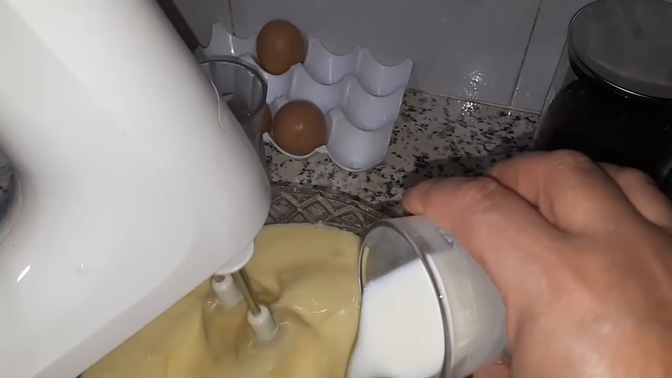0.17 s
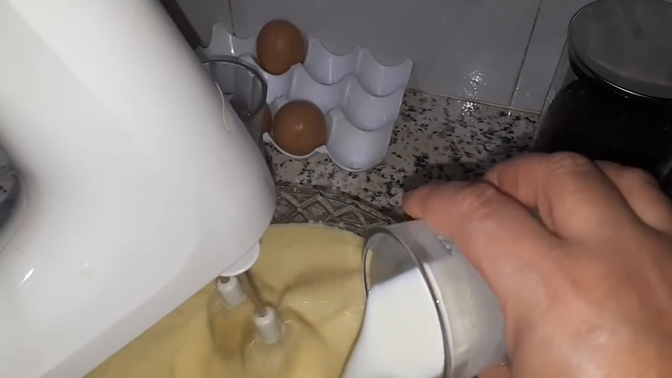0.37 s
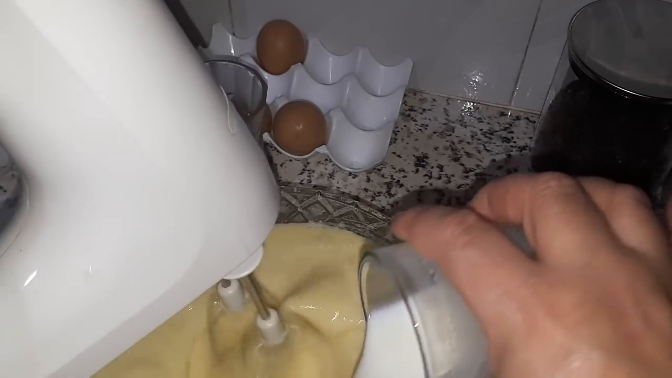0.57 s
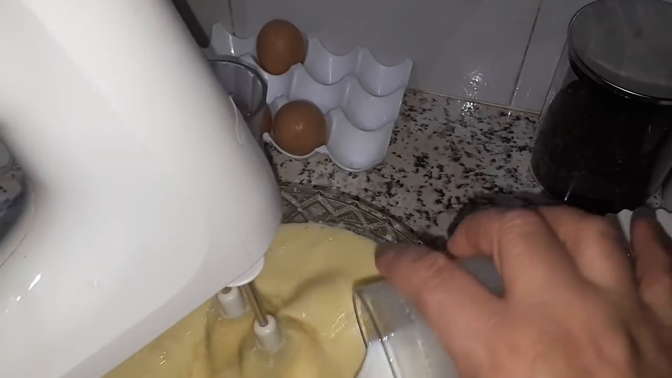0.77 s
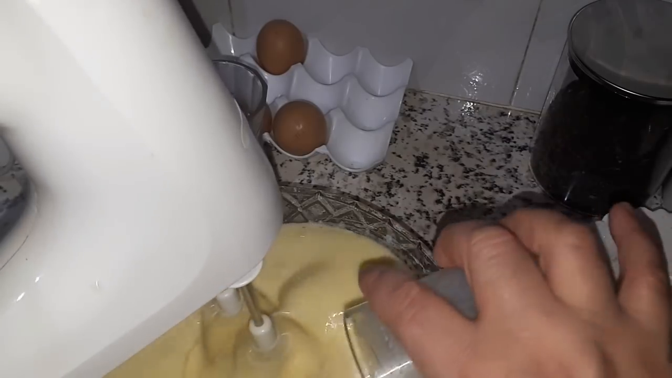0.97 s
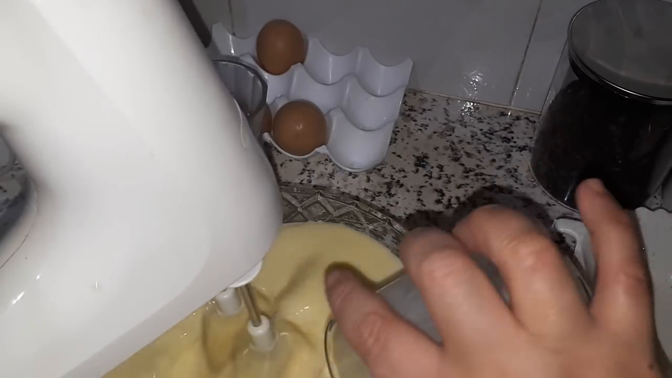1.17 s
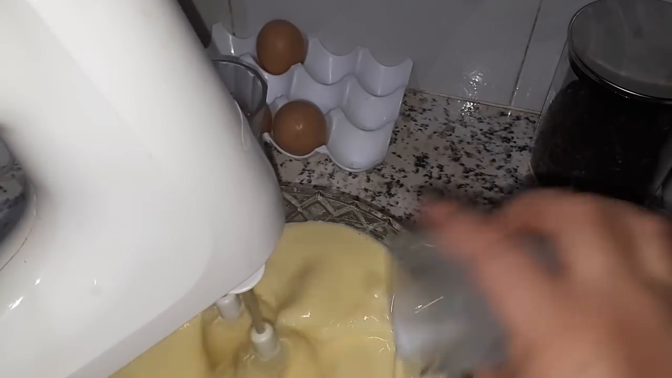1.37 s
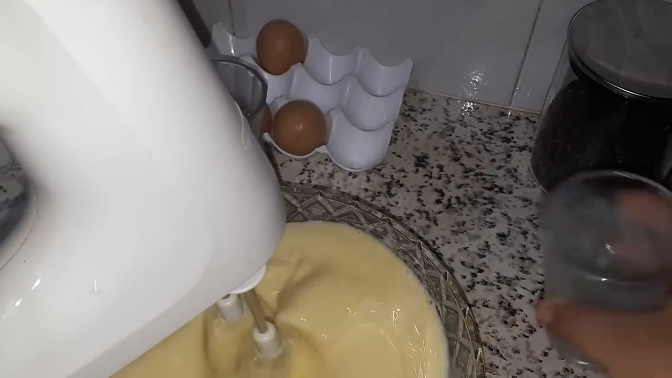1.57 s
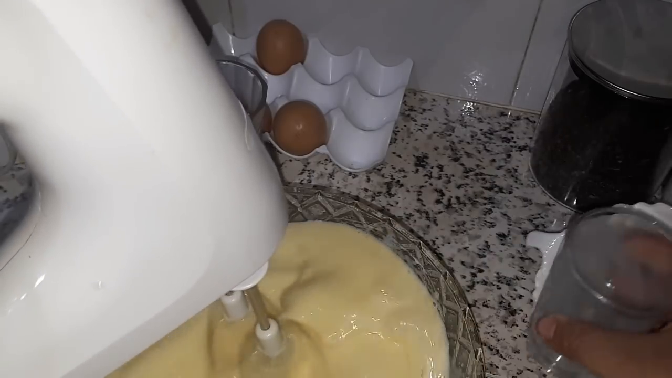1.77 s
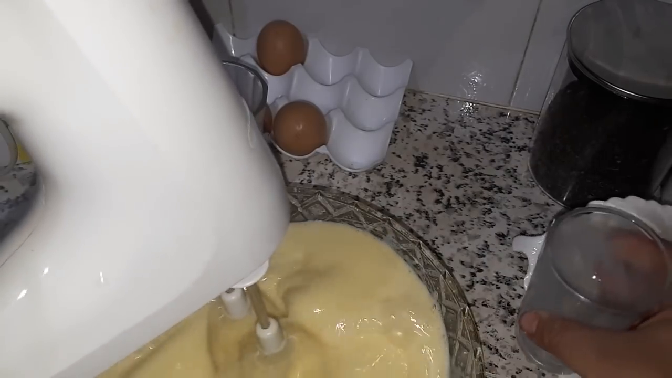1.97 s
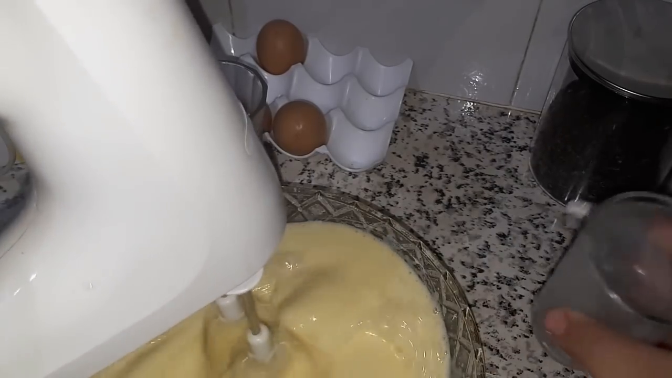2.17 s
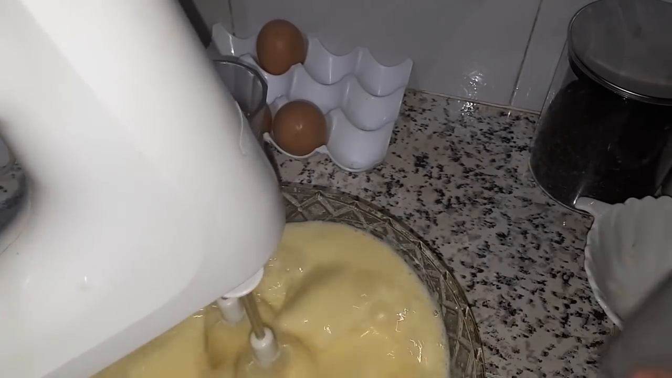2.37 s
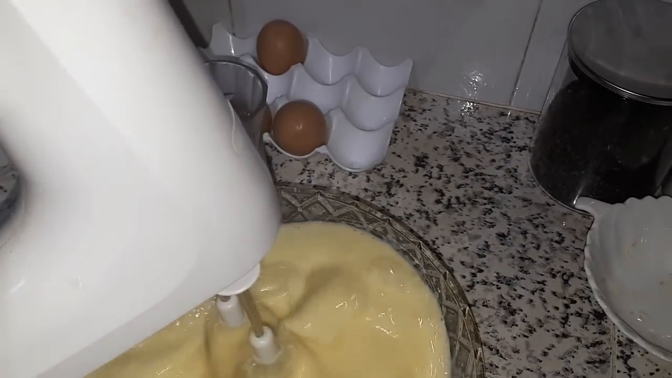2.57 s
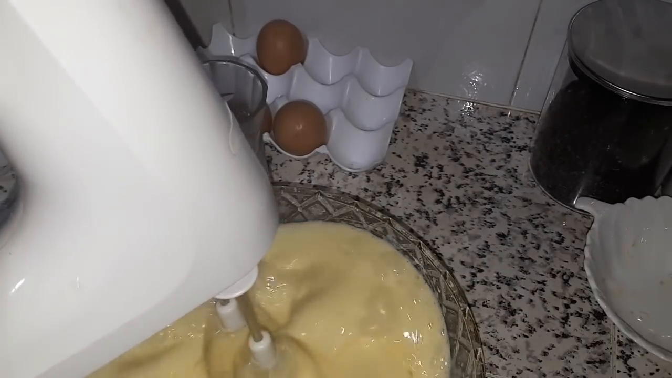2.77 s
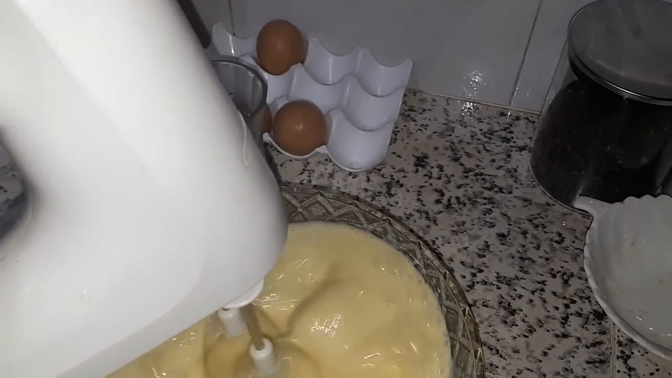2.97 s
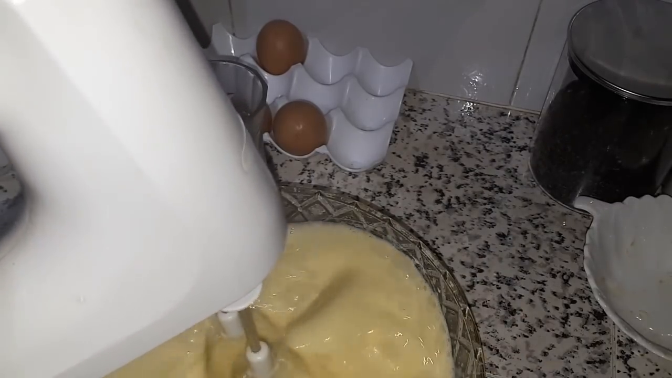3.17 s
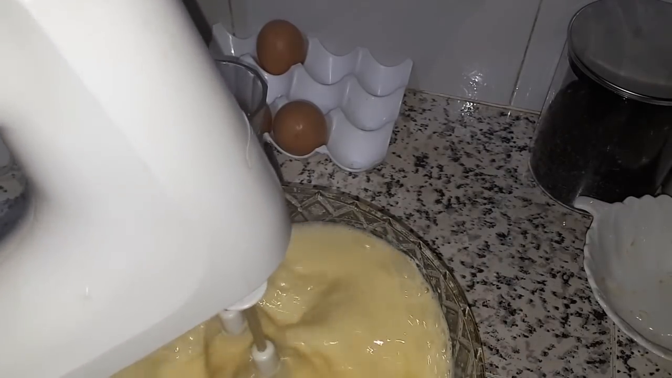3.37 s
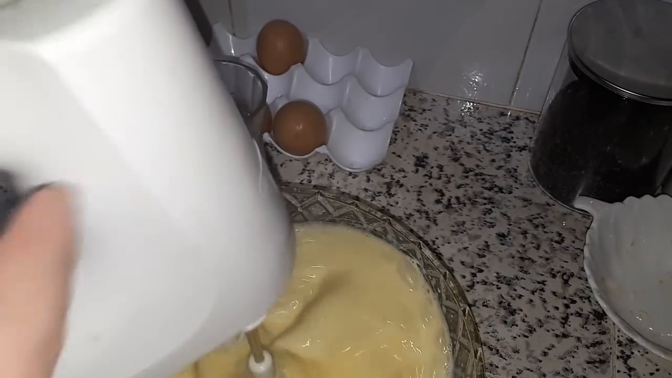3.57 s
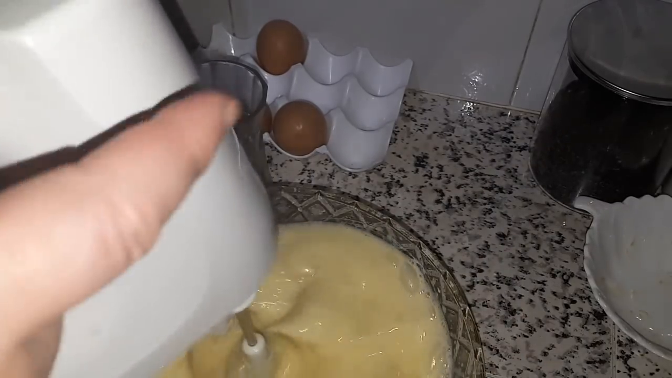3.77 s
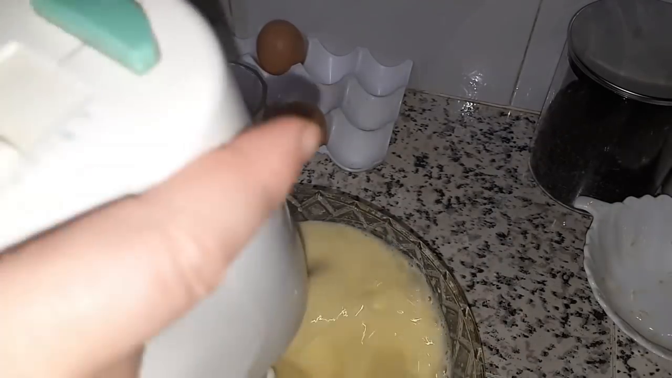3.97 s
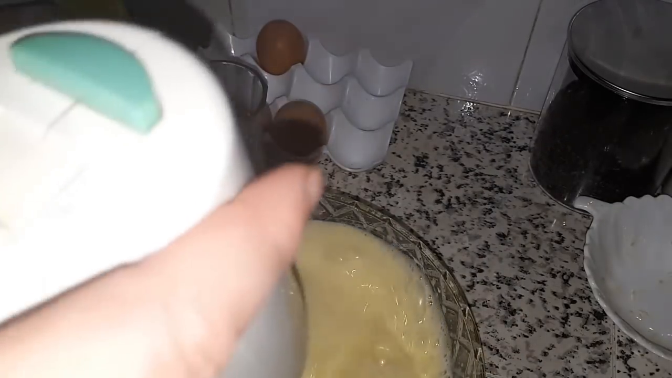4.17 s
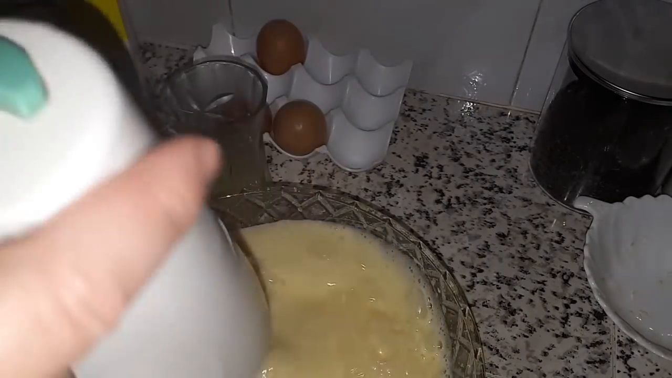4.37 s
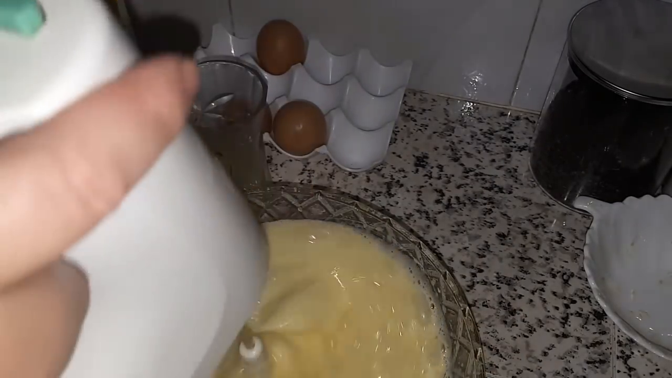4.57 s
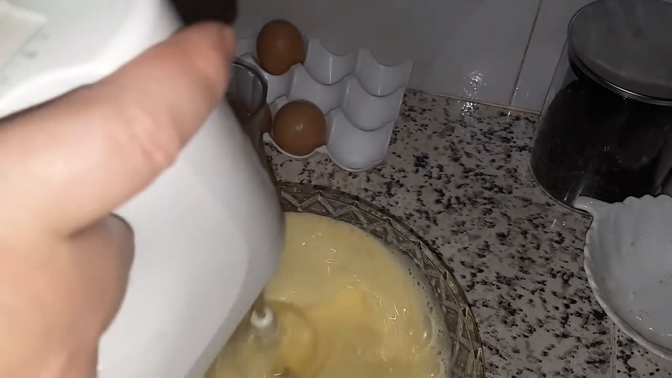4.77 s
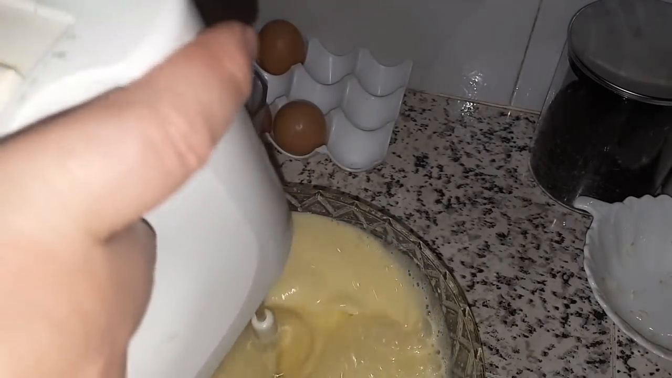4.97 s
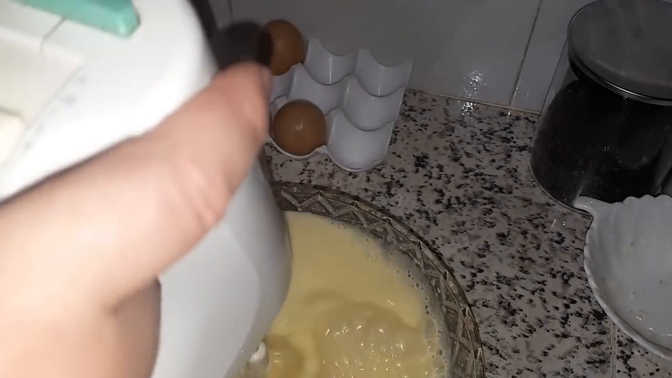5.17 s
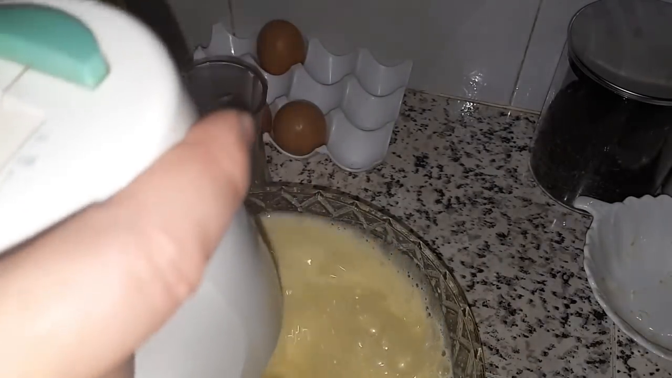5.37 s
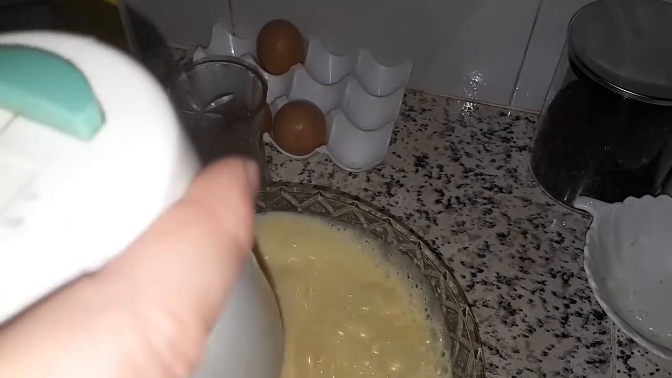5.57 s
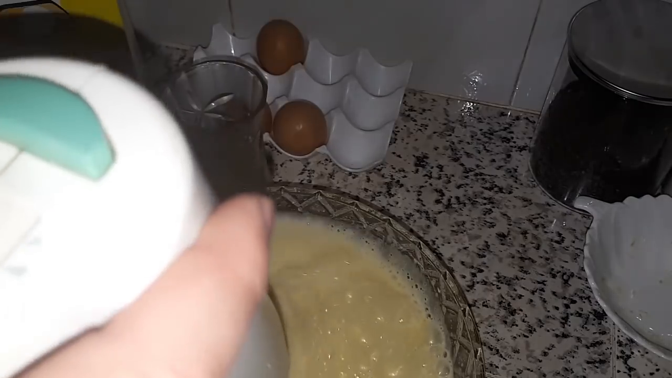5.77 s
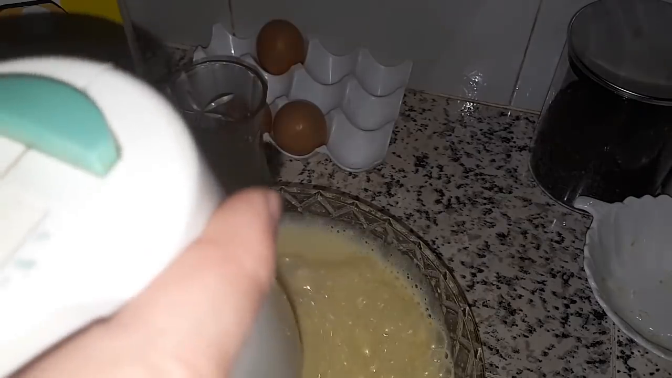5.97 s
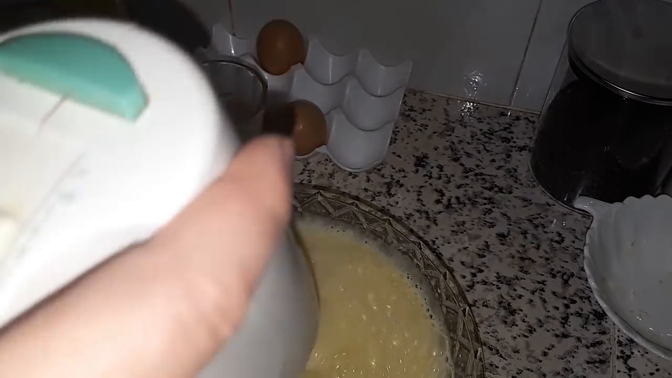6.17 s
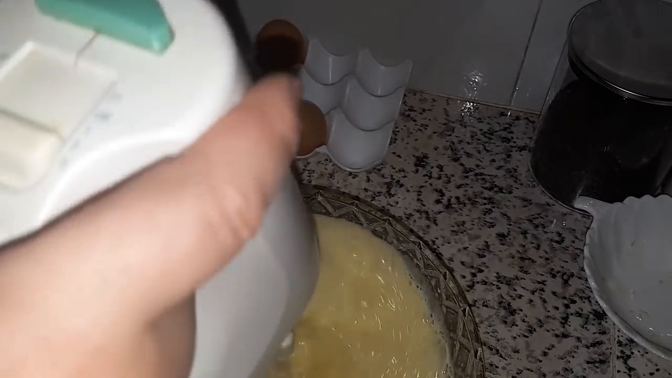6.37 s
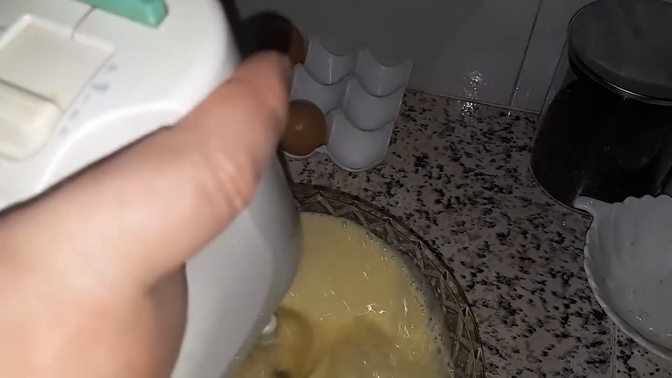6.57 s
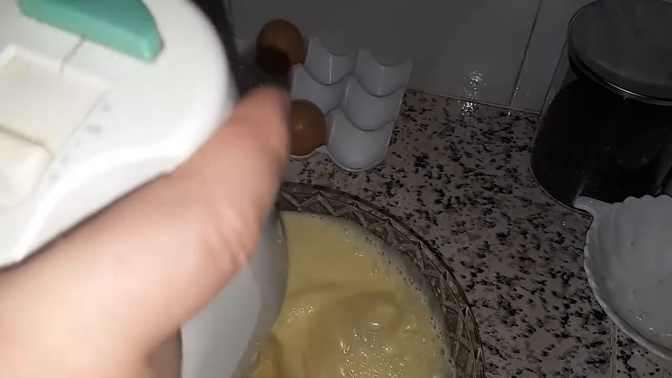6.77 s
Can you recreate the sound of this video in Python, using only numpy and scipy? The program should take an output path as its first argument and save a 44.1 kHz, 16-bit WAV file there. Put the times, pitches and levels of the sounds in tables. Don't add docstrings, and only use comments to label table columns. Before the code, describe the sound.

Close phone pickup in a small tiled kitchen: an electric mixer buzzes continuously, dry and rough, its beaters churning thick batter and tapping the bowl. A drinking glass rattles onto a dish and clinks again shortly after, while the motor sounds briefly quieter. Then the whir swells back, its resonance changes with handling, knocks become stronger and more frequent, and a few blunt batter slaps come near the end.

```python
import sys
import numpy as np
from scipy import signal
from scipy.fft import rfft, irfft, next_fast_len
from scipy.io import wavfile
from scipy.ndimage import uniform_filter1d, map_coordinates

SR = 44100
rng = np.random.default_rng(int(sys.argv[2]) if len(sys.argv) > 2 else 0)


def waveform_to_disk(signal):
    frames = np.transpose(np.atleast_2d(signal))
    scaled = np.clip(frames, -1, 1) * 32767
    samples = np.round(scaled).astype(np.int16)
    wavfile.write(sys.argv[1], SR, samples)


def decibels_to_gain(level_db):
    exponent = np.asarray(level_db, float) / 20
    return 10 ** exponent


N = 300301
T = np.arange(N) / SR
SIZE = next_fast_len(N, True)
F = np.maximum(np.fft.rfftfreq(SIZE, 1 / SR), 1)
SHAFT_HZ, GEAR_RATIO = 166.85, 12


def at_time(table):
    return np.interp(T, *np.transpose(table))


def along(table):
    hz, value = np.transpose(table)
    return np.interp(np.log(F), np.log(np.maximum(hz, 1)), value)


def walk(rate_hz):
    k = int(SR / rate_hz)
    steps = np.repeat(rng.standard_normal(N // k + 1), k)
    w = uniform_filter1d(uniform_filter1d(steps, k), k)[:N]
    return w / w.std()


def unit_rms(x):
    return x / np.sqrt(np.mean(x ** 2))


def held(start_s, hold_s, attack_s, release_s):
    rise = np.clip((T - start_s) / attack_s, 0, 1)
    return rise * np.exp(-np.maximum(T - start_s - attack_s - hold_s, 0) / release_s)


def at_ports(phase, lead_rad):
    return np.sin(phase - np.array([[0], [lead_rad]])) / max(abs(np.cos(lead_rad / 2)), .6)


# pitch_hz, lead_rad
PORT_LEAD = [(0, 0.31), (1810, 0.96), (2150, 1.14), (3450, 7.99), (4820, 8.66), (6500, 15), (10900, 24.23),
             (15500, 22.8)]
# pitch_hz, likeness (0-1)
PORT_LIKENESS = [(60, .92), (150, .96), (400, .92), (1000, .72), (2500, .56), (6000, .58), (12000, .42)]
# pitch_hz, level_db
PORT_BALANCE = [(125, -1.5), (300, 1.5), (600, 0), (1200, 0.1), (4000, 0.5), (9000, 0)]


def ports(force):
    same, other = rfft(force * rng.standard_normal((2, N)), SIZE, axis=1)
    alike = np.clip(along(PORT_LIKENESS), 0, 1)
    lead_rad = np.interp(F, *np.transpose(PORT_LEAD))
    right = (alike * same + np.sqrt(1 - alike ** 2) * other) * np.exp(-1j * lead_rad)
    balance = decibels_to_gain(along(PORT_BALANCE) * np.array([[.5], [-.5]]))
    mono_loss = np.sqrt((1 + 1.33 * alike * np.cos(lead_rad)) / 2)
    return np.array([same, right]) * balance / mono_loss


# pitch_hz, width_hz, level_db
COLOUR_HOLLOWS = [(1660, 26, -15), (2565, 245, -5.5)]


def colour(bed, peaks):
    power = decibels_to_gain(2 * (along(bed) - 1.85))
    for hz, width_hz, db in peaks:
        power = power + decibels_to_gain(2 * db) / (1 + (2 * (F - hz) / max(width_hz, hz / 28)) ** 2) ** 2
    hollow_db = sum(db / (1 + (2 * (F - hz) / width_hz) ** 2) for hz, width_hz, db in COLOUR_HOLLOWS)
    power = power * decibels_to_gain(2 * hollow_db)
    cepstrum = irfft(np.log(power) / 2, SIZE)
    cepstrum[1:SIZE // 2] *= 2
    cepstrum[SIZE // 2:] = 0
    return np.exp(rfft(cepstrum))


def rattle(rate_hz, scatter_db, decay_ms):
    sizes = decibels_to_gain(scatter_db * np.clip(rng.standard_normal(N), -2, 2))
    hits = (rng.random(N) < rate_hz / SR) * sizes
    return unit_rms(signal.lfilter([1], [1, -np.exp(-1000 / (decay_ms * SR))], hits))


def shaking_forces(shaft):
    beater = shaft / GEAR_RATIO
    blades = 1 + 0.028 * np.cos(beater) + 0.088 * np.cos(2 * beater + 1) + 0.044 * np.cos(4 * beater + 2)
    load_db = 0.35 * walk(12)
    batter = (0.74 + 0.32 * rattle(120, 5.2, 5.4)) * blades
    beating = (0.41 + 0.42 * rattle(220, 1.9, 6.6)) * blades * decibels_to_gain(load_db)
    gears_low = (.5 + .5 * rattle(400, 2.9, 6.2)) * (1 + 0.18 * np.cos(shaft))
    gears_low = gears_low * decibels_to_gain(load_db + 0.5 * walk(20))
    gears_high = (.5 + .5 * rattle(420, 3.0, 3.9)) * (1 + 0.2 * np.cos(shaft))
    gears_high = gears_high * decibels_to_gain(load_db + 0.14 * walk(11))
    brushes_low = (0.5 + 0.63 * rattle(300, 4.0, 2.2)) * (1 + 0.072 * np.cos(shaft + 1))
    brushes_low = brushes_low * decibels_to_gain(0.13 * load_db + 1.22 * walk(22.07))
    brushes_high = (1 + 0.18 * np.cos(shaft + 2)) * decibels_to_gain(.5 * load_db + 1.5 * walk(18))
    return [batter, beating, gears_low, gears_high, brushes_low, brushes_high]


POSE_S = [
    1.6,
    3.0,
    3.8,
    4.7,
    6.2,
]
BAND_EDGES_HZ = [620, 1720, 4750, 7900, 11600]
# pitch_hz, width_hz, level_db
ALONE = [(310, 51, -4.5), (1020, 165, 0), (1350, 29, -8), (1883, 23, 0.5), (2415, 44, -4.5),
         (3340, 570, -1.5), (3660, 48, -3), (4200, 280, -2.5), (5370, 82, 1), (5880, 310, 2.5),
         (6620, 400, -3), (10580, 530, -5), (10960, 370, -2)]
# pitch_hz, width_hz, level_db
SETTLED = [(319, 40, -12), (1037, 190, -3), (1913, 28, 0.5), (3300, 280, 1), (3780, 43, 0),
           (4190, 180, 1.5), (4610, 79, -3), (5420, 110, 3), (5850, 290, 4.5), (6560, 380, 1),
           (10640, 1100, -6.5)]
# pitch_hz, width_hz, level_db
TOUCHED = [(1010, 420, -3), (1486, 210, -2.5), (3410, 23, -0.5), (3800, 160, -0.5), (4600, 120, -2.5),
           (5500, 69, -3), (5730, 64, -3), (6370, 370, -2), (10670, 1000, -5)]
# pitch_hz, width_hz, level_db
GRIPPED = [(1020, 200, 7), (1420, 310, 3.5), (1828, 77, 0), (2034, 39, -2), (2743, 79, -4.5),
           (3100, 20, -3), (3160, 49, -15), (3880, 76, -4), (4160, 93, -0.5), (4530, 53, -7),
           (5640, 430, 3), (6000, 200, 2), (10600, 1000, -4)]
# pitch_hz, width_hz, level_db
TURNED = [(415, 68, -1.5), (1010, 255, 2), (1474, 270, -3), (1916, 45, -5), (2290, 110, -5.5),
          (2700, 53, -9), (3200, 82, -8), (3690, 69, -4.5), (4200, 410, -3), (5500, 300, 2.5),
          (5950, 200, -5), (6400, 830, -5), (10600, 1300, -4.5)]
# pitch_hz, width_hz, level_db
BOWL = [(325.6, 69, -2.5), (430.4, 71, -2.5), (960, 35, -30)]
# pitch_hz, level_db (per Hz)
BEDS = [
    [(25, -34), (250, -7), (604, -18.5), (1010, -5.5), (2660, -7), (5820, -4), (8970, -16.5),
     (15800, -24.5)],
    [(25, -36), (307, -6), (542, -25), (929, -13.5), (2590, -4.5), (6490, -7.5), (7420, -10), (15800, -18)],
    [(25, -55), (161, -9.5), (473, -15), (955, -4), (2730, -11), (5500, -10), (7830, -11), (15800, -21)],
    [(25, -54), (161, -15), (542, -20), (981, 6), (1680, -12), (6000, -3), (8200, -9), (15800, -17)],
    [(25, -53), (165, -8), (672, -12.5), (1220, -7.5), (2890, -10.5), (5520, -8), (8270, -12.5),
     (15800, -17.5)],
]


def housing(shaft, heard_db):
    below = [0, *(1 / (1 + (F / hz) ** 12) for hz in BAND_EDGES_HZ), 1]
    level_bands_hz = [(120, 600), (650, 1700), (4800, 6600), (9000, 13000)]
    part_of_force = [0, 1, 2, 2, 3, 3]
    shares = [np.interp(T, POSE_S, row) for row in np.eye(len(POSE_S))]
    modes_by_pose = [ALONE, SETTLED, TOUCHED, GRIPPED, TURNED]
    poses = [colour(bed, [*modes, *BOWL]) for bed, modes in zip(BEDS, modes_by_pose)]
    out = np.zeros((2, N))
    for k, force in enumerate(shaking_forces(shaft)):
        part = part_of_force[k]
        lo_hz, hi_hz = level_bands_hz[part]
        in_band = (F > lo_hz) & (F < hi_hz)
        wave = ports(unit_rms(force)) * np.sqrt(below[k + 1] - below[k])
        gain = decibels_to_gain(heard_db[part] + 1.5)
        for share, pose in zip(shares, poses):
            shell = irfft((wave * pose).astype(np.complex64), SIZE)[:, :N]
            out += gain * share * shell / np.sqrt(np.sum(abs(pose[in_band]) ** 2) * 2 / SIZE)
    return out


def wander(x):
    echo_ms, sway_ms, echo_db = 1.403, .12, -8
    place = np.arange(N) + np.cumsum(.005 * walk(14))
    slid = np.array([map_coordinates(c, [place], order=2, mode="mirror") for c in x])
    lag = (echo_ms + sway_ms * np.array([walk(3), walk(3)])) * SR / 1000
    echo = np.array([np.interp(np.arange(N) - d, np.arange(N), c) for c, d in zip(slid, lag)])
    return (slid + decibels_to_gain(echo_db) * echo) / np.sqrt(1 + decibels_to_gain(2 * echo_db))


# start_s, hold_s, level_db
LEANS = [
    (0, 1.55, -48),
    (3.7, .14, -44),
    (4.46, .62, -49),
    (5.85, .7, -55),
]


def counter_hum(shaft, gain_db):
    ease_s, loose_db = .08, -60
    lean = decibels_to_gain(loose_db) + sum(decibels_to_gain(db) * held(s, hold_s, ease_s, ease_s / 2) for s, hold_s, db in LEANS)
    level = lean * decibels_to_gain(gain_db + 2 * walk(14)) * (1 + .6 * np.cos(shaft / GEAR_RATIO))
    return level * at_ports(shaft + 1.0 * walk(16), 0)


# order (x shaft), then level_db under the gears in each of the five poses
WHINE = [(11, -49, -26, -10.5, -27, -15.5), (12.7, -41, -33, -12, -10.5, -20),
         (20.6, -36, -34, -26, -43, -15.5), (21, -23, -28, -42, -8.5, -25), (22, -27, -29, -33, -37, -28),
         (22.9, -9, -33, -25, -7, -10.5), (25, -26, -10, -2, -47, -9), (26, -6, -24, -15, -8, -23),
         (28, -39, -31, -31, -31, -30), (33.44, -37, -34, -12, -7, -27), (35.6, -26, -26, -27, -7, -3),
         (36.5, -35, -27, -10, -5.5, -16)]


def whine(shaft, gears_db):
    slip_rad, flicker_db = .11, 3.5
    out = np.zeros((2, N))
    for order, *pose_db in WHINE:
        db = gears_db - 1 + np.interp(T, POSE_S, pose_db) + flicker_db * walk(20)
        lead_rad = np.interp(order * SHAFT_HZ, *np.transpose(PORT_LEAD))
        out += decibels_to_gain(db) * at_ports(round(order) * (shaft + slip_rad * walk(20)), lead_rad)
    return out


# start_s, level_db
PHONE_GAIN = [(0, -0.5), (1.72, -2), (1.86, -3), (1.98, -8.5), (2.14, -11), (2.68, -13), (2.9, -12),
              (3.35, -8), (4.05, -4), (4.85, 0), (5.4, -1), (6.3, -1), (6.81, -1.5)]
# start_s, level_db
CHURN = [(0, 2.5), (0.35, 3), (1.15, 1.5), (1.7, 1), (2.2, 3.5), (2.65, 1), (2.95, 3), (3.35, 1), (3.7, 2),
         (4.2, 0), (4.7, 1.5), (5.0, -1), (5.73, -0.5), (6.0, 3.5), (6.3, 0.5), (6.47, 1.5), (6.81, 0)]
# batter_db, beaters_db, brushes_db
PARTS_BY_POSE = [
    (-11, -6.5, -3),
    (-10, -4, -8.5),
    (-16, -6, -6),
    (-14, -6, -9.5),
    (-15, -4.5, -7),
]


def mixer():
    gears_db = -24.5
    gain_db, churn_db = at_time(PHONE_GAIN), at_time(CHURN)
    batter_db, beaters_db, brushes_db = (np.interp(T, POSE_S, db) for db in np.transpose(PARTS_BY_POSE))
    parts_db = np.array([batter_db + churn_db, beaters_db + churn_db, 0 * T, brushes_db])
    heard_db = gears_db + gain_db + parts_db
    shaft = 2 * np.pi * np.cumsum(SHAFT_HZ * (1 + 0.000436 * walk(2))) / SR
    return wander(housing(shaft, heard_db)) + counter_hum(shaft, gain_db) + whine(shaft, heard_db[2])


def add(out, start_s, hz, db, t60_s, gripped_s=.3):
    i = int(start_s * SR)
    t = np.arange(min(int(min(t60_s, .3) * SR), N - i)) / SR
    fade = np.exp(-np.log(1000) * (t / t60_s + np.maximum(t - gripped_s, 0) / 0.1))
    fade = fade * np.minimum(t / 0.00093, 1)
    out[:, i:i + len(t)] += decibels_to_gain(db) * fade * at_ports(2 * np.pi * hz * t, .7)


def knock(blows, partner_db=-5):
    out = np.zeros((2, N))
    for start_s, db, hz in blows:
        add(out, start_s, hz, db, .022)
        add(out, start_s, 1450 if hz < 1200 else 980, db + partner_db, .018)
    return out


def turns(runs):
    graze_db, fade_db_per_turn = -3, -2.5
    for start_s, count, db, hz in runs:
        count = round(count)
        for k in range(count):
            if count == 1:
                step_db = 0
            elif k == 0:
                step_db = graze_db
            else:
                step_db = fade_db_per_turn * (k - 1)
            yield start_s + k * GEAR_RATIO / SHAFT_HZ, db + step_db, hz


# start_s, turns, level_db (peak), pitch_hz
KNOCK_RUNS = [(0.192, 1, -19, 950), (0.208, 1, -14, 1010), (0.337, 1, -14, 942), (0.464, 2, -11.5, 1400),
              (0.624, 1, -16, 1000), (1.129, 2, -13.5, 1090), (1.148, 1, -14, 1130), (1.178, 1, -15, 1340),
              (1.287, 1, -13.5, 1070), (1.431, 1, -13, 1080), (1.536, 1, -16, 1230), (2.976, 1, -19, 947),
              (3.418, 1, -19, 940), (3.55, 1, -17, 920), (3.766, 2, -14, 970), (4.008, 1, -7, 1150),
              (4.163, 1, -18.5, 1470), (4.251, 1, -14, 990), (4.479, 4, -9, 1020), (4.508, 1, -12.5, 980),
              (4.603, 2, -14.5, 1060), (4.864, 3, -8, 1040), (4.89, 1, -11, 1070), (5.149, 3, -15, 1300),
              (5.306, 1, -10.5, 1540), (5.749, 2, -12, 1020), (5.988, 1, -12.5, 1000),
              (6.177, 1, -14, 1360), (6.264, 3, -7.5, 970), (6.48, 1, -9, 1020), (6.622, 1, -14, 1030),
              (6.655, 1, -13.5, 1360)]
# start_s, level_db (peak), pitch_hz
TAPS = [(.008, -12, 1020), (.031, -19, 1360), (0.047, -12, 1030), (.122, -17, 1000), (0.138, -15, 960),
        (.41, -15, 835), (0.481, -19, 860), (1.199, -32, 1060), (1.504, -20, 1090), (1.647, -18, 1020),
        (3.203, -23, 1040), (3.915, -32, 1130), (4.536, -13, 1010), (5.637, -16, 1450), (5.796, -18, 1400),
        (5.894, -13, 1540), (6.052, -18, 1400), (6.108, -19, 1470), (6.131, -27, 1500), (6.245, -17, 1450),
        (6.552, -16, 1020), (6.748, -13.5, 1500)]
# start_s, turns, level_db (peak), pitch_hz
SLAP_RUNS = [(3.504, 2, -25, 306), (4.402, 1, -24.5, 339), (5.808, 4, -16, 450), (6.189, 1, -23, 323),
             (5.882, 2, -19, 640), (6.265, 2, -19, 610), (5.886, 1, -24, 300), (6.098, 1, -24, 330),
             (6.478, 1, -29, 432)]


def beaters():
    out = knock([*turns(KNOCK_RUNS), *TAPS])
    for start_s, db, hz in turns(SLAP_RUNS):
        for ratio, under_db in [(0.933, 0.5), (1.34, -20.0), (0.656, -4.5)]:
            add(out, start_s, hz * ratio, db + under_db, .03)
    return out


# pitch_hz, family (row of RUBS), level_db
GLASS = [(1297, 0, -1), (1350, 0, -6), (2643, 1, -2), (2765, 2, -1), (4420, 3, -2), (4613, 3, -4),
         (4290, 3, -14), (5685, 4, 1.5), (6923, 5, 0), (9550, 5, -14), (12400, 5, -13), (14000, 5, -17),
         (14700, 5, -15)]
# start_s, level_db, hold_s
RUBS = [
    [(1.684, -16, 0.0088), (1.723, -28, 0.039), (1.766, -23.5, 0.049), (1.845, -39, 0.013)],
    [(1.684, -17.5, 0.014), (1.716, -16, 0.033), (1.765, -19, 0.026), (1.803, -23.5, 0.06)],
    [(1.757, -11.5, 0.0094), (1.8, -22, .015), (1.853, -17.5, 0.04)],
    [(1.686, -23, .012), (1.703, -12, 0.053), (1.764, -20, 0.035), (1.812, -19, 0.018), (1.83, -29, 0.028),
     (1.858, -16.5, 0.036)],
    [(1.71, -18, 0.01), (1.745, -24, 0.057), (1.85, -27, 0.032)],
    [(1.684, -20, 0.022), (1.731, -22, 0.03), (1.808, -16.5, 0.016), (1.875, -22.5, 0.0092)],
]


def chatter():
    attack_s, release_db_per_s = .0015, 600
    tilt_s, tilt_bend = (1.865, 1.915), .035
    release_s = 20 / np.log(10) / release_db_per_s
    family = [sum(decibels_to_gain(db) * held(s, hold_s, attack_s, release_s) for s, db, hold_s in rubs) for rubs in RUBS]
    on = slice(int(RUBS[0][0][0] * SR), int((RUBS[-1][-1][0] + .15) * SR))
    bend = tilt_bend * np.interp(T[on], tilt_s, [0, 1]) ** 2
    out = np.zeros((2, N))
    for hz, k, db in GLASS:
        shake = family[int(k)][on] * decibels_to_gain(db - 2.0 + 3 * walk(330)[on])
        phase = 2 * np.pi * hz * np.cumsum(1 + (k == 2) * bend) / SR
        out[:, on] += shake * at_ports(phase + .8 * walk(75)[on], 2.0)
    return out


# start_s, level_db (peak), pitch_hz
CRACKS = [
    (1.6845, 0, 2600),
    (2.2213, -5, 2100),
    (2.2237, -8, 2100),
    (2.2285, -12, 2300),
    (2.251, -18, 1800),
    (2.8625, -15, 2600),
]


def cracks():
    out = np.zeros((2, N))
    for start_s, db, hz in CRACKS:
        for spread, late in zip(decibels_to_gain(np.linspace(-7, 17, 12)), rng.random(12)):
            slope_db = -7.6 * np.log2(max(spread, 1))
            add(out, start_s + 0.00091 * late, hz * spread, db - 12.5 + slope_db, .025)
    return out


# start_s, level_db (peak), pitch_hz
BUMPS = [(1.723, -11, 1550), (1.749, -10, 1420), (1.796, -16, 1360), (1.845, -16.5, 1090),
         (1.883, -15.5, 1360), (2.318, -16, 1500), (2.383, -19, 1490), (2.419, -20, 1010),
         (2.458, -21, 1450), (2.561, -21, 1010)]
# start_s, pitch_hz, level_db (peak), t60_s,
# gripped_s (clock time)
RINGS = [(2.222, 872, -30, .2, 2.4), (2.222, 520, -27, .05, 2.3), (2.222, 660, -26, .04, 2.3),
         (2.863, 800, -27, .05, 2.9), (2.878, 1040, -27, .05, 2.9), (2.228, 1292, -22.5, .75, 2.45),
         (2.222, 1545, -17, .07, 2.48), (2.232, 1340, -25, .35, 2.4), (2.256, 1325, -20, .08, 2.45),
         (2.29, 1315, -24, .08, 2.45), (2.322, 1390, -28, .08, 2.45), (2.25, 1540, -30, .12, 2.3),
         (2.222, 1044, -24, .07, 2.3), (2.249, 1990, -26, .04, 2.3), (2.222, 2020, -24, .04, 2.3),
         (2.222, 2643, -35, .7, 2.31), (2.223, 6923, -27, .08, 2.3), (2.223, 9500, -33, .1, 2.3),
         (2.229, 14700, -34, .05, 2.3), (2.224, 12400, -37, .05, 2.3), (2.224, 4414, -28, 3., 2.3),
         (2.224, 4613, -21.5, 3., 2.3), (2.338, 4414, -22, .4, 2.48), (2.3414, 4414, -21, .4, 2.48),
         (2.34, 2755, -24.5, .22, 2.45), (2.342, 4613, -32, .3, 2.47), (2.863, 926, -19.5, .08, 2.92),
         (2.877, 926, -20.5, .08, 2.92), (2.898, 930, -26, .3, 2.918), (2.89, 3150, -31, .15, 2.93),
         (2.875, 450, -27, .06, 2.95), (2.863, 3149, -27, .08, 2.9), (2.863, 560, -29, .08, 2.95)]


def glass():
    out = knock(BUMPS, partner_db=-6) + chatter() + cracks()
    for start_s, hz, db, t60_s, gripped_s in RINGS:
        add(out, start_s, hz, db, t60_s, gripped_s - start_s)
    return out


def kitchen(x, t60_s=.2, wet_db=-18):
    t = np.arange(int(.3 * SR)) / SR
    tail = rng.standard_normal((2, len(t))) * np.exp(-np.log(1000) * t / t60_s) * (t > .003)
    tail *= decibels_to_gain(wet_db) / np.sqrt(np.sum(tail ** 2, axis=1, keepdims=True))
    return x + signal.fftconvolve(x, tail, axes=1)[:, :N]


def scene():
    no_bass = signal.butter(3, 330, "high", fs=SR, output="sos")
    return mixer() + kitchen(signal.sosfilt(no_bass, beaters() + glass()))


def roll_off(x):
    return signal.sosfilt(signal.butter(12, 16830, fs=SR, output="sos"), x)


DUCKED_HZ = [7600, 9300]
# start_s, level_db
TREBLE_DUCK = [(1.682, 0), (1.69, -30), (1.755, -30), (1.77, -9), (1.82, -9), (1.83, -30), (1.855, -30),
               (1.87, -8), (1.91, 0)]


def record(dry):
    loud = np.tanh(dry)
    band = signal.butter(6, DUCKED_HZ, "band", fs=SR, output="sos")
    weak = signal.sosfiltfilt(band, loud)
    ducked = loud - (1 - decibels_to_gain(at_time(TREBLE_DUCK))) * weak
    top_cut = signal.ellip(10, .2, 80, 15950, fs=SR, output="sos")
    return roll_off(signal.sosfilt(top_cut, ducked))


dry = scene()
out = record(dry)
waveform_to_disk(out)
```